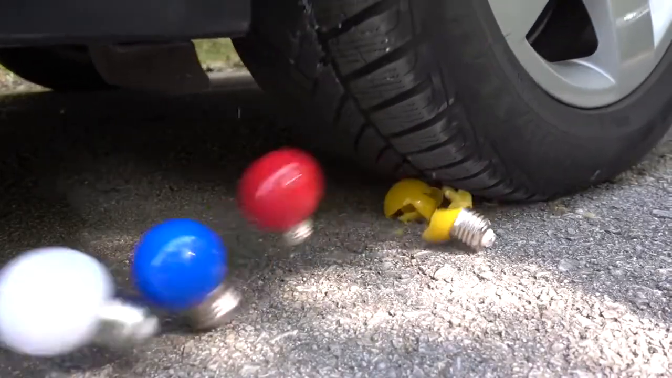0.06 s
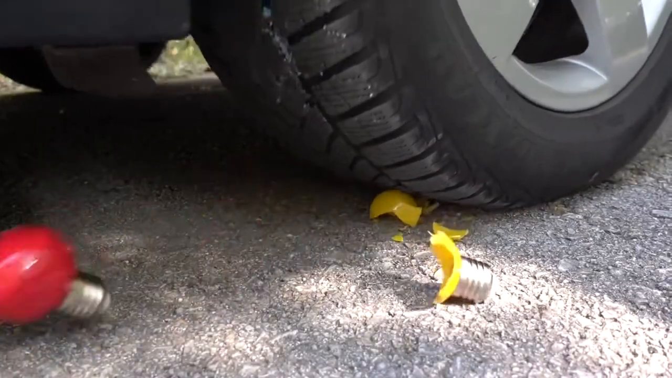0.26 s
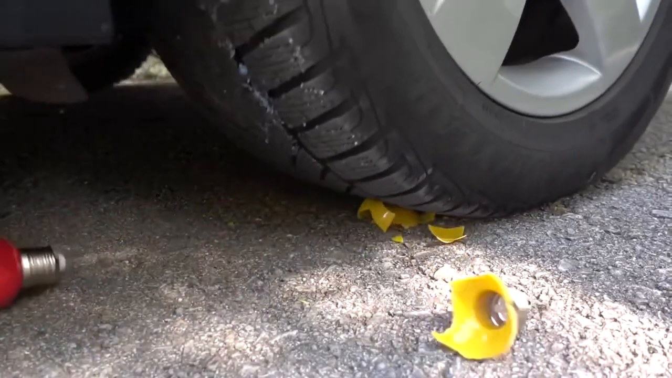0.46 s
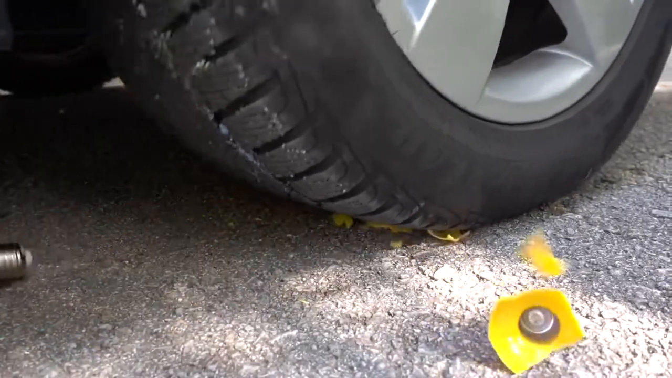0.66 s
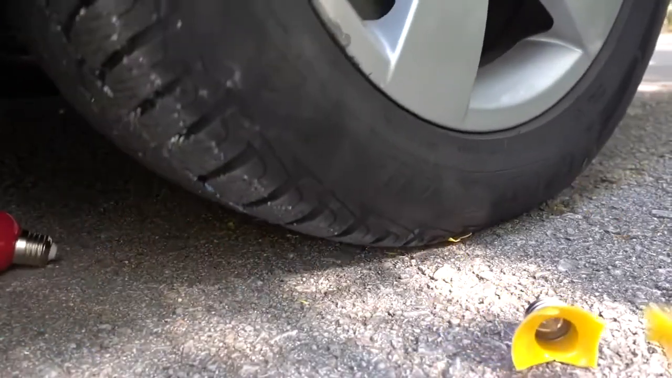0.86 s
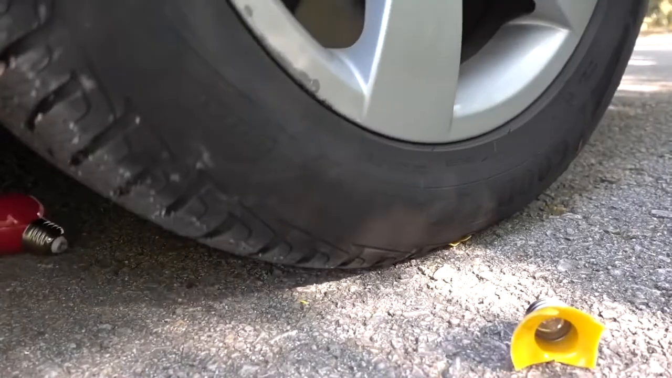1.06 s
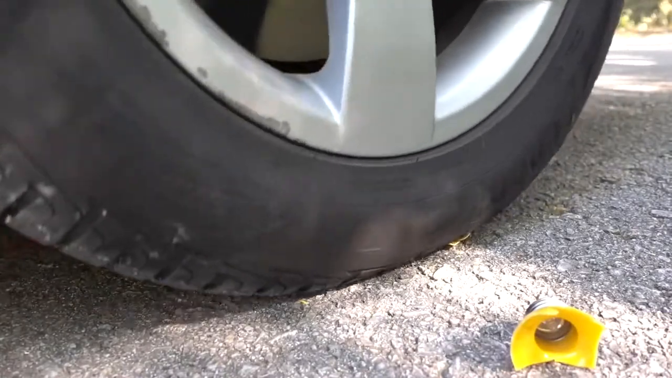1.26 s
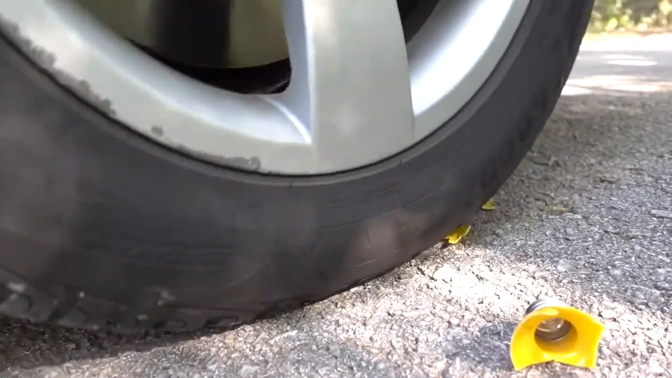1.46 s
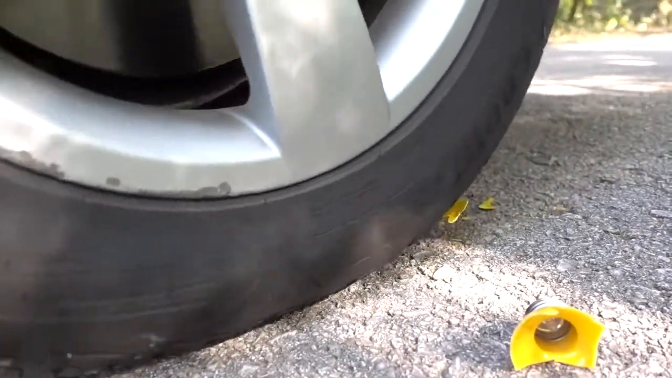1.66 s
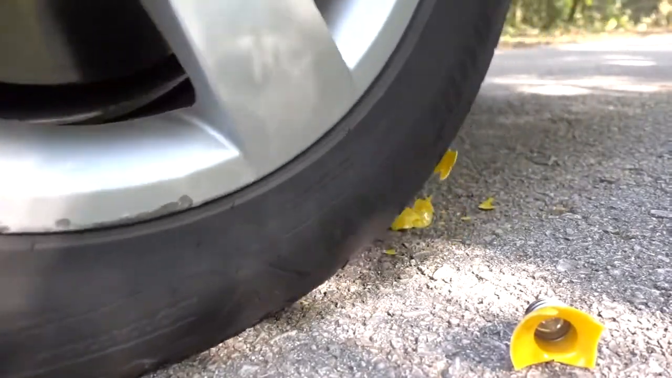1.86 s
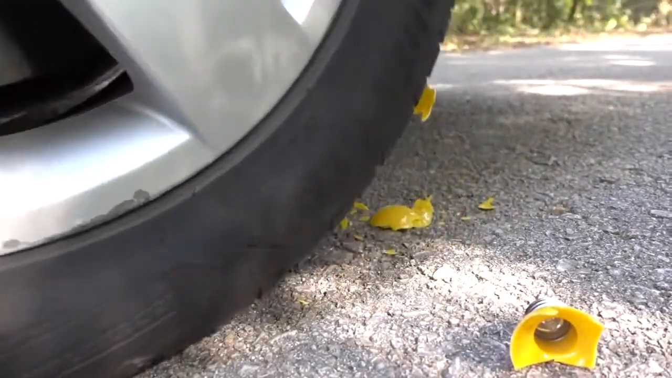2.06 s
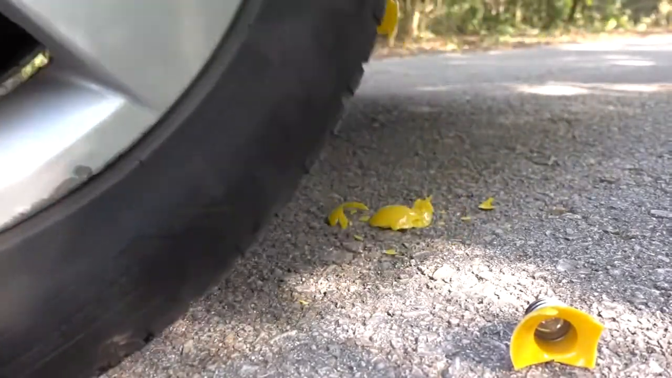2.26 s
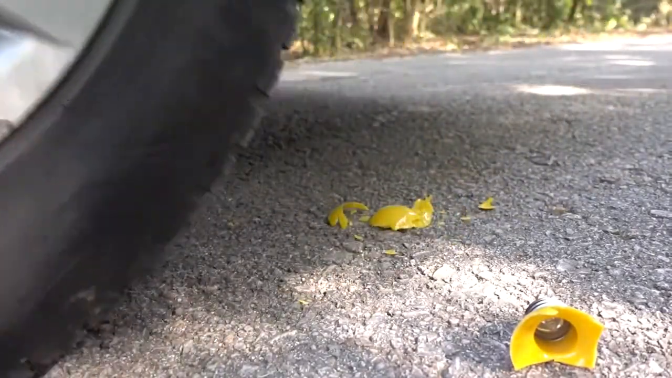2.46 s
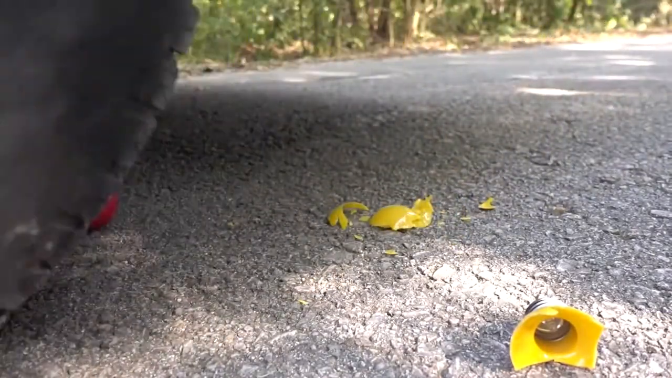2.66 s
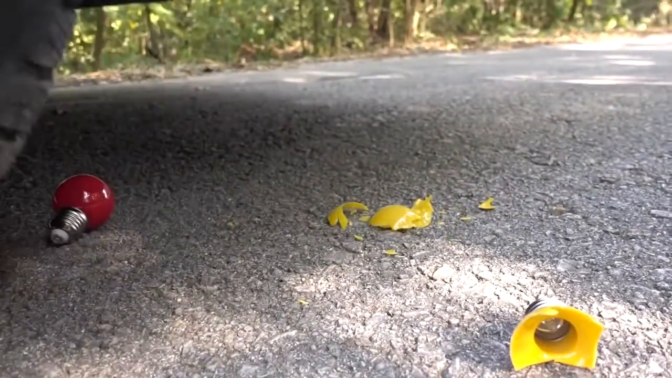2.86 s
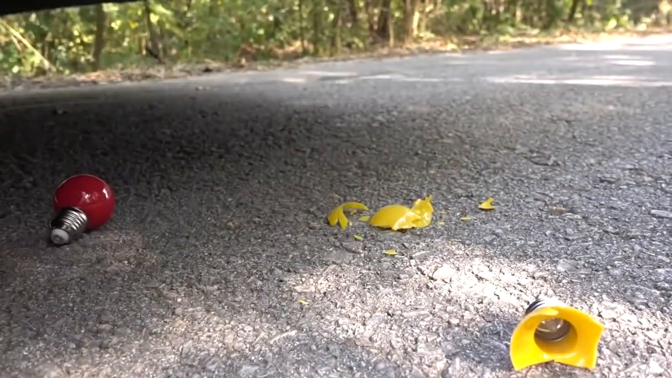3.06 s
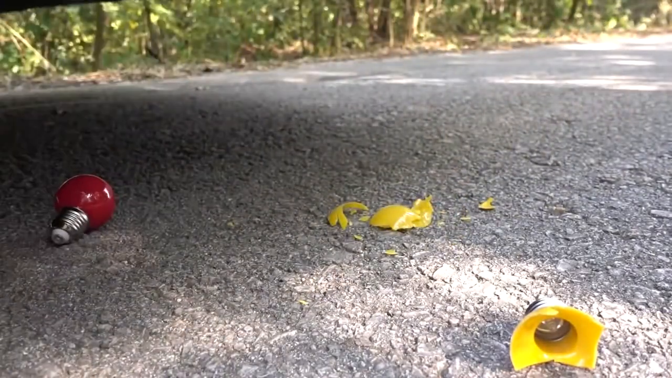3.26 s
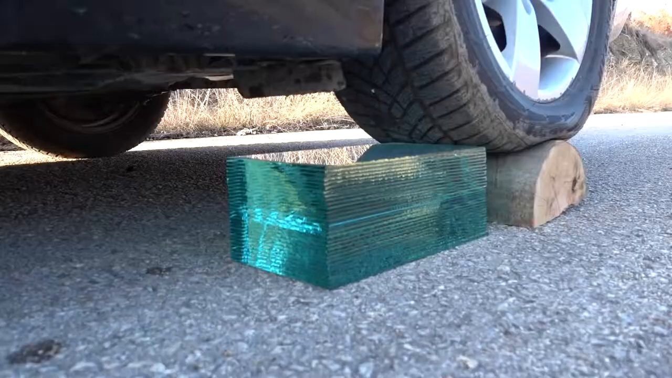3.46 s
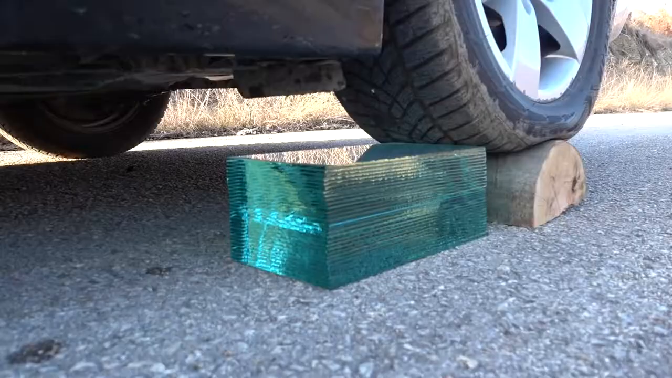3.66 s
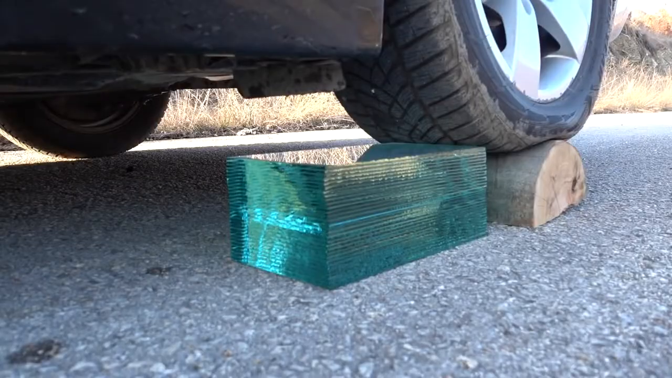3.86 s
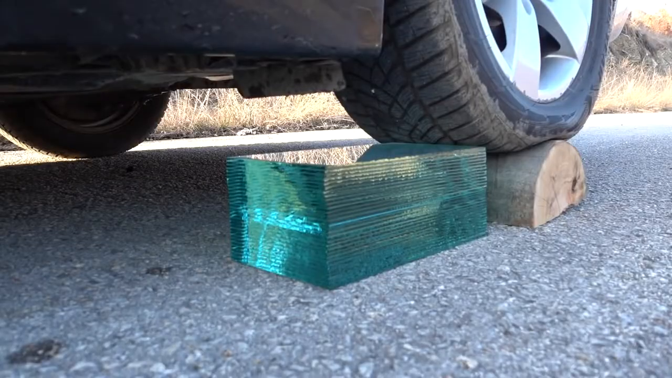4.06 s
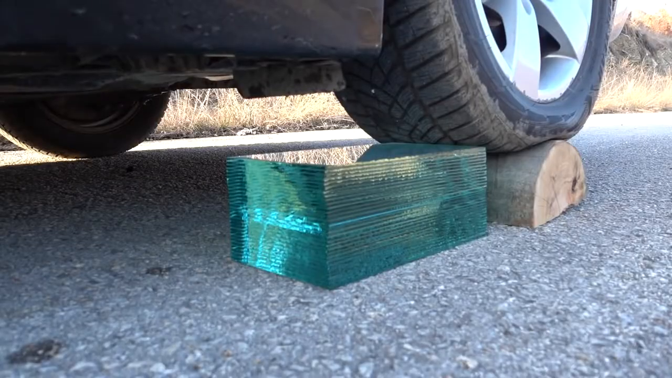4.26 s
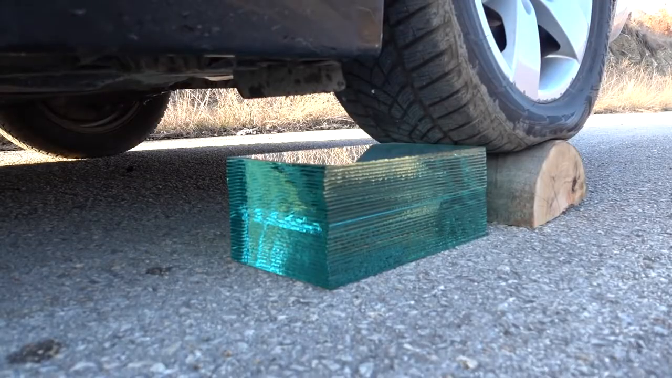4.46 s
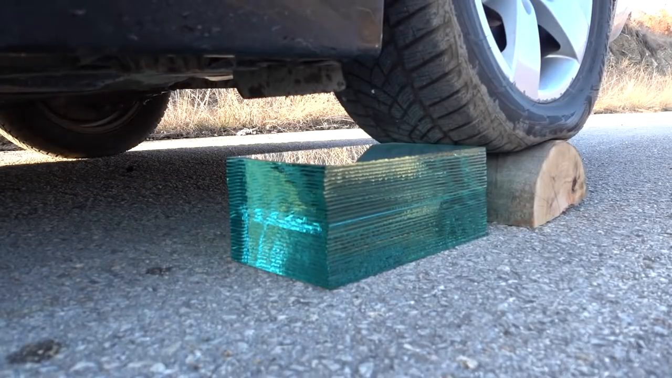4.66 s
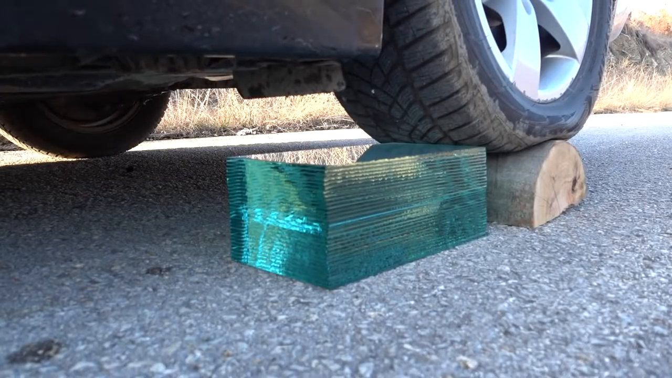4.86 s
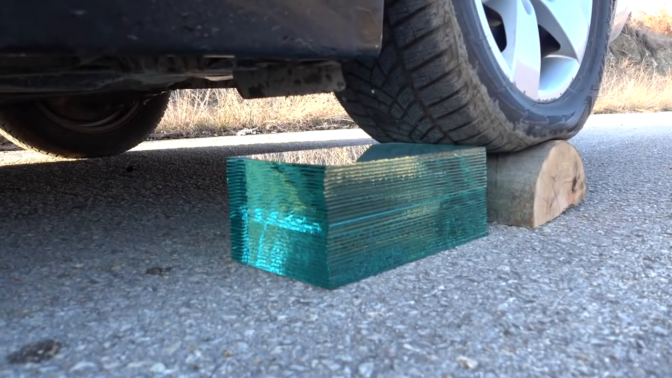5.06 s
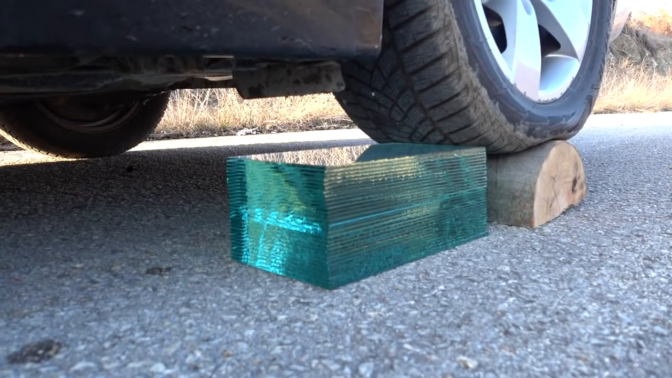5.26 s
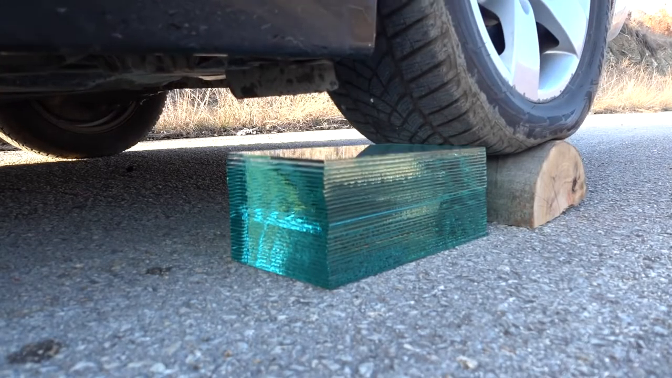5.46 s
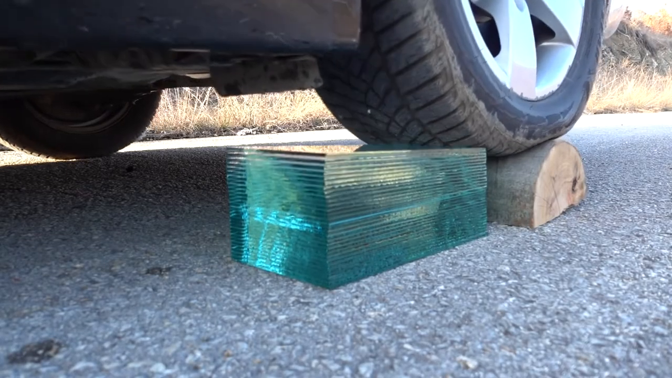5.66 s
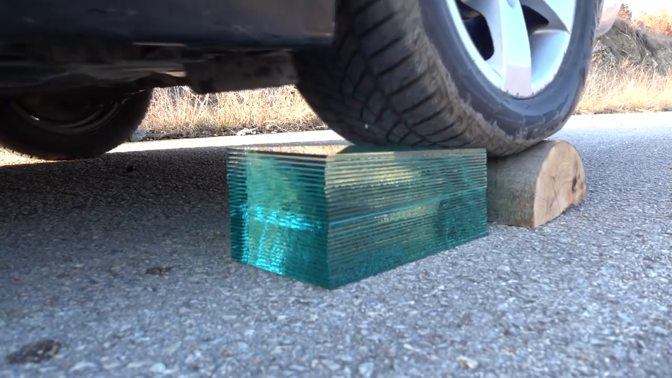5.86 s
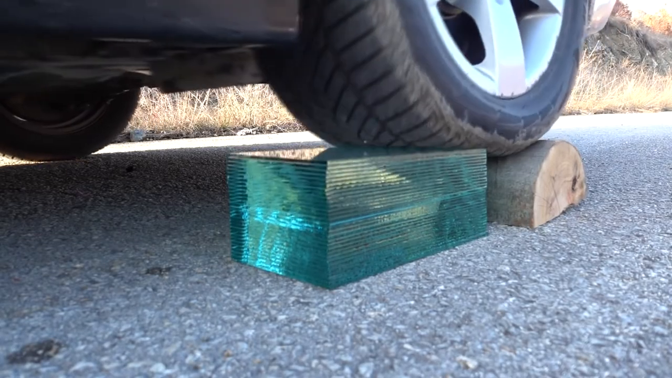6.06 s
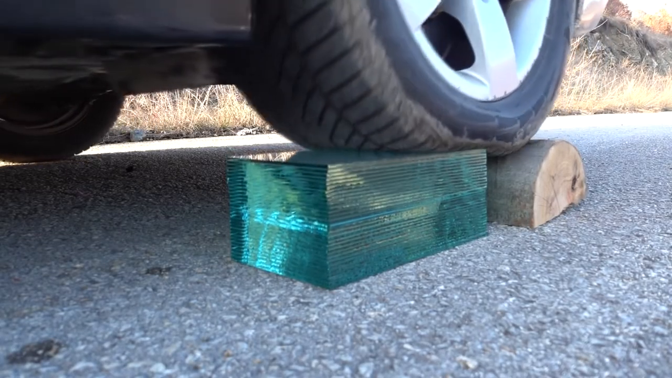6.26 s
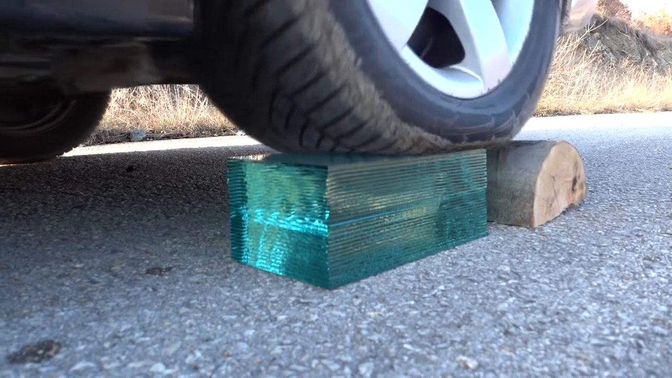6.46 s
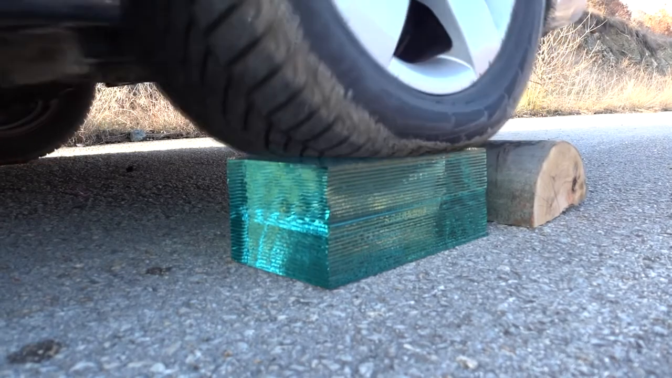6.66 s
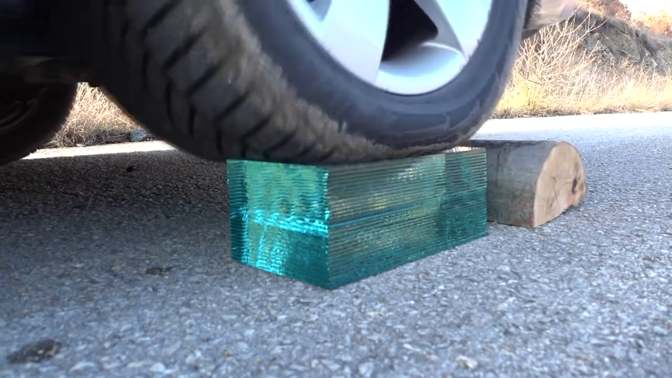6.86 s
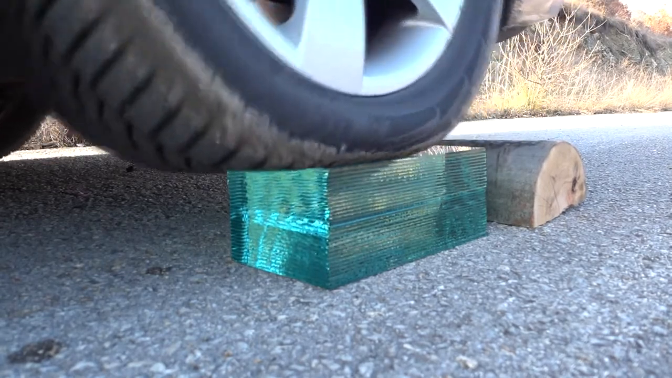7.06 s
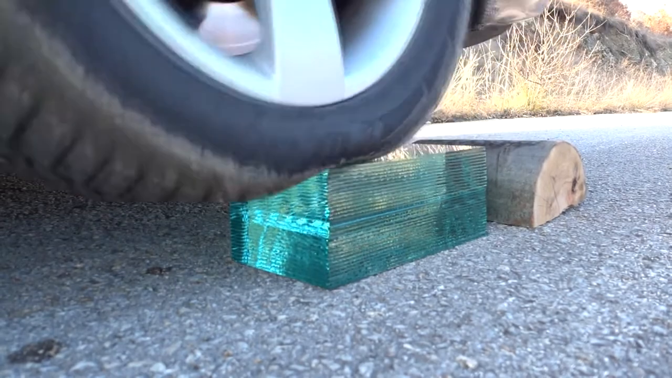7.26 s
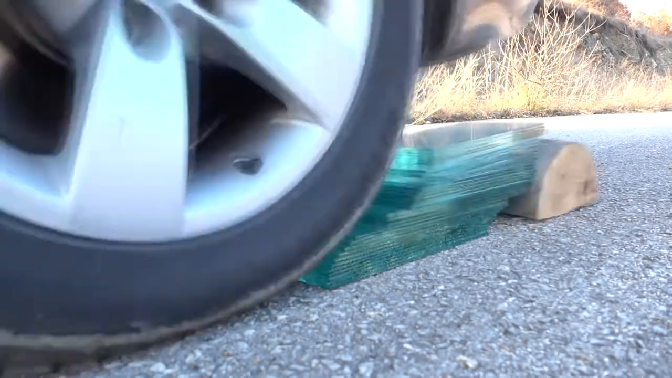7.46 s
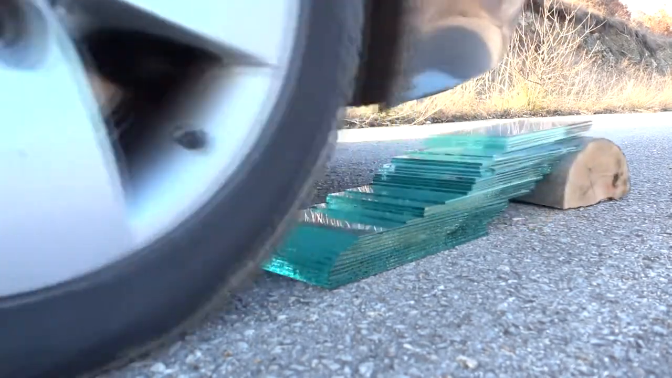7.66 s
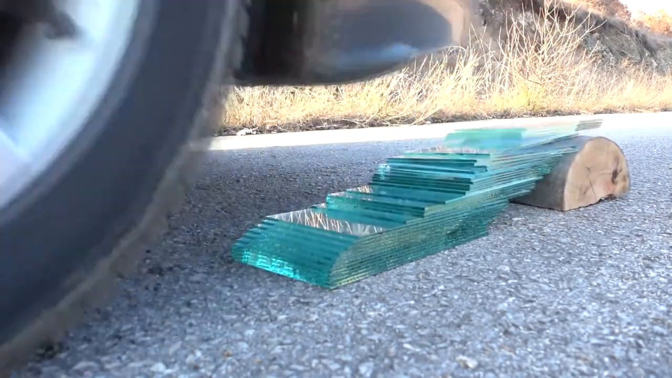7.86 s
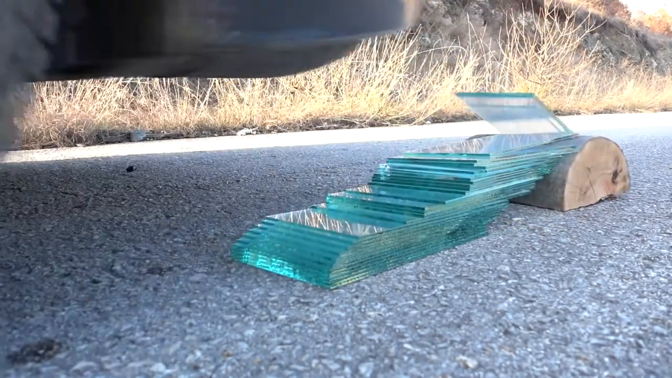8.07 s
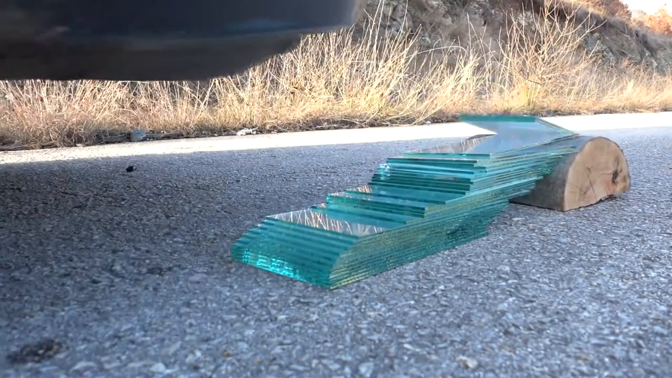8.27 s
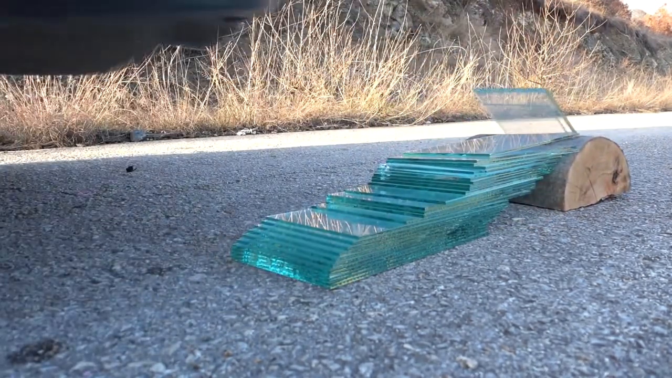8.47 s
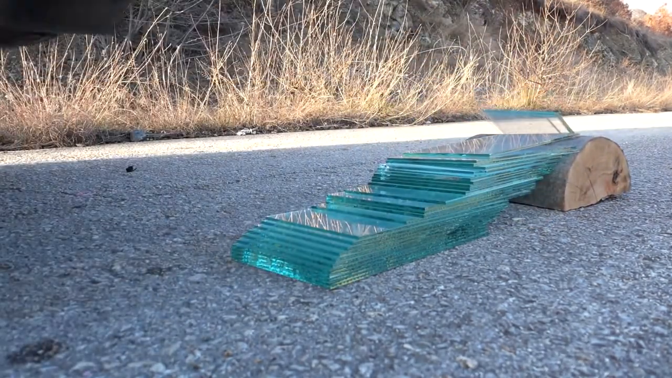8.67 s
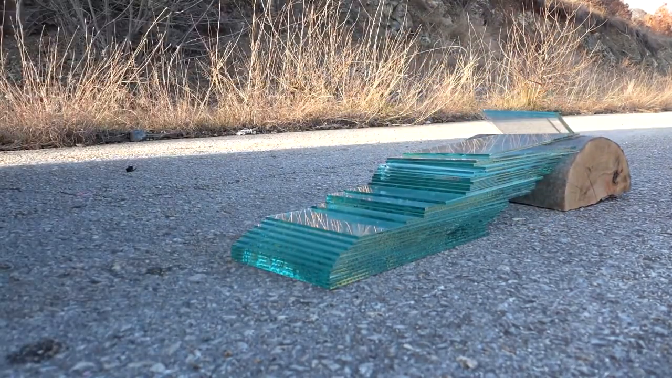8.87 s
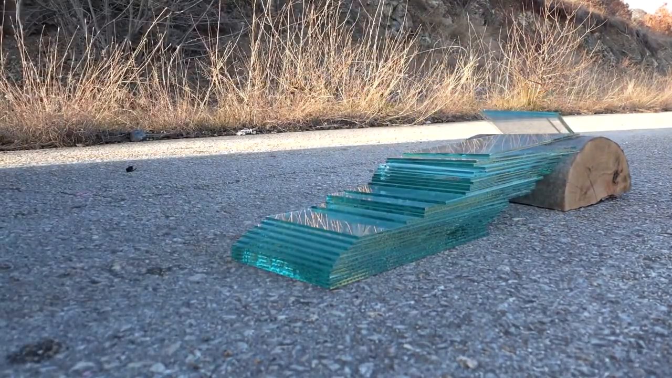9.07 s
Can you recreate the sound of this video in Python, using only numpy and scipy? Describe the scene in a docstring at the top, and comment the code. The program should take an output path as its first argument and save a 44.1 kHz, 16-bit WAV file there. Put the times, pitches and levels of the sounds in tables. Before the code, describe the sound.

Very close to a car tyre on asphalt outdoors, bulbs burst in loud overlapping snaps with crumbling splinters. Grit ticks sparsely as the wheel rolls off to the left. After a tiny dip the car clunks metallically, then glass panes crack in quick succession and grind. The wheel drops with dull thuds, the stack slides and clatters, and last panes clack as the car moves on.

```python
"""Beside a car tyre on asphalt: small light bulbs burst as sharp snaps with crumbling showers and a crunch of grains,
then grit ticks under the tread as the wheel rolls off to the left. The level dips briefly; the car clunks in
ringing metal modes and creeps onto a stack of glass panes, which crack one after another and grind.
The wheel drops off the edge with dull blows of damped noise, and the stack slides apart in a clattering rush of
grains; the exhaust passes the microphone and the last panes clack down as the car, in shaped noise, moves on."""
import sys
import numpy as np
from scipy import signal
from scipy.fft import rfft, irfft, next_fast_len
from scipy.io import wavfile
from scipy.ndimage import uniform_filter1d

SR = 44100
rng = np.random.default_rng(int(sys.argv[2]) if len(sys.argv) > 2 else 0)


def bounce(signal):
    """Save signal as a 16-bit WAV file at the path given by the first command-line argument."""
    frames = np.transpose(np.atleast_2d(signal))
    limited = np.clip(frames, -1, 1)
    pcm = np.round(limited * 32767).astype(np.int16)
    wavfile.write(sys.argv[1], SR, pcm)


N = 402191
TIME = np.arange(N) / SR

# All levels are relative: layer gains, the underbody scatter and the microphone input come after them.

# Engine and road hiss. Each row: time in seconds, level in dB.
ENGINE_LEVEL = [(1.8,-75),(3.2,-61),(4.1,-62.5),(5.0,-63.5),(5.6,-59),(7.2,-48),(7.9,-50),(9.12,-55)]
# Tyres rolling away. Each row: time in seconds, level in dB.
ROLL_LEVEL = [(2.9,-79),(3.5,-64),(3.7,-86),(7.3,-62),(7.6,-36),(8.2,-46),(8.8,-44),(9.12,-48)]
# The car lurches on its springs. Each row: time in seconds, body shaking in dB, ring of the tyre's air in dB,
# dying away of the body in dB per second.
SPRING_LURCHES = [(.03, -25.5, -24, 80), (.61, -33, -35, 69), (0.819, -41, -37.5, 77),
                  (3.69, -52.5, -67.5, 51), (5.358, -28.5, -35.5, 188), (7.5, -21.5, -22, 95)]
# The car clunks as it takes up the load. Each row: start in seconds, peak in dB.
LOAD_CLUNKS = [(3.492, -33.5), (3.617, -39), (3.734, -26.5), (3.742, -32), (4.164, -30), (4.526, -27.5),
               (4.535, -36.5), (5.187, -26), (5.217, -29.5), (5.227, -30.5), (5.243, -29.5)]
# What the clunks ring with. Each row: pitch in Hz, middle level in dB, 60 dB decay in seconds.
METAL_MODES = [(297,-14.5,0.16),(357,-4,0.17),(432,-1,0.13),(497,0,0.16),(582,-7,0.2),(624,-10,0.35),(825,-4,0.042),(1038,-25,0.36),(1709,-14,0.13),(1820,-8,0.1),(2043,-6,0.078),(2347,-8,.1),(2634,-12,0.059)]
# Dull blows through tyre and stack. Each row: start in seconds, peak in dB, pitch in Hz, 60 dB decay in seconds.
DULL_BLOWS = [(0.009, -19, 220, 0.077), (0.086, -19, 219, 0.059), (0.136, -47, 124, 0.079),
              (0.336, -25, 86, 0.018), (0.585, -22, 252, 0.17), (0.653, -28.5, 232, 0.17),
              (0.8, -19, 730, 0.21), (0.833, -28.5, 221, 0.17), (1.195, -37, 890, 0.21),
              (1.93, -42.5, 520, 0.052), (2.07, -44, 480, 0.14), (2.564, -40.5, 328, 0.048),
              (2.959, -49.5, 436, 0.24), (3.955, -54, 272, 0.12), (4.457, -44.5, 130, 0.15),
              (5.3, -37, 500, 0.27), (5.332, -26.5, 354, 0.14), (5.358, -24, 273, 0.11),
              (5.408, -37, 294, 0.054), (5.879, -38.5, 198, 0.036), (7.125, -25.5, 590, 0.086),
              (7.194, -24, 600, 0.061), (7.382, -25, 410, 0.13), (7.461, -12, 267, 0.17),
              (7.493, -14.5, 226, 0.12), (7.55, -25, 272, 0.12), (7.744, -18, 684, 0.061),
              (7.819, -25.5, 516, 0.14), (7.914, -17, 590, 0.057), (7.889, -28, 1500, 0.051),
              (8.171, -25.5, 590, 0.23), (8.604, -29.5, 200, 0.087)]
# The loudest bulb shells snapping. Each row: start in seconds, peak in dB, ring in Hz, crumbling in dB re the snap.
SHELL_SNAPS = [(0.134, -8.5, 2030, -9), (0.171, -3, 1340, -19.5), (0.211, -8, 2600, -13),
               (0.242, -1, 8300, -17), (0.335, -10.5, 3100, -16), (0.376, -2.5, 1770, -22),
               (0.405, -4, 7750, -11), (0.446, -12.5, 5670, -5.5), (0.506, -8, 5200, -9.5),
               (0.531, -5.5, 3040, -12), (0.587, 2, 1080, -12.5), (0.653, -4.5, 9100, -13),
               (0.686, -5.5, 4850, -15), (0.736, 4, 2040, -73), (0.784, -2, 7960, -25),
               (0.799, -5, 1310, -9), (0.854, -9, 4660, -20), (0.923, -2.5, 5200, -39),
               (0.955, -15.5, 1070, -11.5), (1.196, -7, 1490, -18), (1.456, -8.5, 3440, -18)]
# Larger stones and crumbs of glass under the tread. Each row: start in seconds, peak in dB, ring in Hz.
STONE_TICKS = [(1.065, -25, 1660), (1.12, -24, 2440), (1.273, -24.5, 915), (1.44, -21, 1390),
               (1.603, -24.5, 1500), (1.672, -25, 5400), (1.742, -28.5, 1700), (1.863, -27.5, 1790),
               (1.912, -26.5, 745), (1.976, -29.5, 1130), (2.088, -30.5, 585), (2.138, -25.5, 2160),
               (2.244, -34.5, 616), (2.293, -24.5, 5050), (2.337, -32, 624), (2.382, -27.5, 2240),
               (2.459, -25.5, 930), (2.479, -23, 910), (2.563, -28, 1350), (2.802, -27, 993),
               (2.833, -25, 1200), (3.029, -36, 4500)]
# The tread pressing on loose grit. Each row: time in seconds, level in dB.
TREAD_LEVEL = [(0, -29.5), (1.05, -42.5), (1.35, -48), (1.6, -47), (1.85, -56), (2.2, -53), (2.5, -47.5),
               (2.85, -46.5), (3.1, -57), (3.45, -69)]
# A thin whistling hiss while the wheel turns. Each row: time in seconds, level in dB.
WHISTLE_LEVEL = [(.9,-46),(1.8,-75),(2.6,-54.5),(3.0,-67)]
# The wheel rolls off to the left. Each row: time in seconds, left minus right in dB.
TREAD_PLACE = [(.5,0.5),(1.7,2),(2.8,4),(3.4,11.5)]
# The loudest cracks of the panes. Each row: start in seconds, peak in dB, crumbling in dB re the crack.
LOUD_CRACKS = [(5.6052, -18, -6), (5.633, -10, -5), (5.661, -14, -8), (5.6903, -6.5, -9), (5.7403, -14, -1),
               (5.8557, -9.5, -7), (5.923, -13, -7), (5.934, -16, 3), (5.98, -4.5, -8),
               (5.998, -11.5, -8.5), (6.0388, -11.5, -13), (6.0655, -1, -21), (6.113, -6, -15.5),
               (6.127, -6, -13), (6.1494, 1, -27), (6.2258, -3.5, -17), (6.2345, -12, -5.5),
               (6.2813, -10, -11), (6.3064, -5, -32), (6.3355, -4, -14), (6.3604, -7, -16),
               (6.4084, -22, -13), (6.4593, -9, -14.5), (6.4857, -22, -14), (6.5181, -5.5, -19),
               (6.5307, -17.5, -23), (6.59, -26, -17), (6.629, -20, -37), (6.6522, -9.5, -16),
               (6.6836, -38, -28), (6.736, -18, -16), (6.7508, -16, -25), (6.774, -14.5, -36),
               (6.7912, -5, -24), (6.8269, -4.5, -22), (6.8516, -6, -22), (6.8794, -8, -22),
               (6.9056, -14, -16.5), (6.963, -7, -13), (6.9795, -11, -3), (7.016, -11.5, -27),
               (7.0707, -11, -13), (7.1255, -12.5, -3.5), (7.137, -13, -3.5), (7.193, -0.5, -23),
               (7.228, -10, -5), (7.2618, -1.5, -23), (7.362, -20.5, -4.5)]
# The cracks' ring sinks as the tyre's weight damps the stack, then comes part way back.
# Each row: time in seconds, middle pitch in Hz.
CRACK_PITCH = [(5.6, 3980), (6.0, 3950), (6.3, 2770), (6.8, 2960), (7.3, 3340)]
# Loose panes clacking on each other. Each row: start in seconds, peak in dB, ring in Hz, chatter in dB re the clack.
LOOSE_CLACKS = [(7.5068, -17, 2230, -3.5), (7.5618, -17, 2920, -4), (7.6097, -10.5, 2020, -3),
                (7.6703, -14, 2030, -25), (7.7196, -15.5, 2000, -3.5), (7.9948, -15.5, 5350, -33),
                (8.0325, -15.5, 4400, -17), (8.0848, -18, 6300, -18.5), (8.299, -18, 2320, -2),
                (8.3096, -11.5, 2260, -12), (8.319, -23.5, 2730, -8), (8.5311, -11, 1940, -16.5),
                (8.5602, -15, 2000, -11), (8.6618, -14.5, 2250, -14), (8.385, -30.5, 2180, -4.5),
                (8.7184, -16, 4100, -9)]
# The panes shift on each other. Each row: start in seconds, end in seconds, scrape in dB, clatter in dB.
STACK_SLIDES = [(5.496, 7.4, -49.5, -80), (7.529, 7.72, -18, -16), (7.952, 7.996, -32, -25),
                (8.55, 8.772, -45, -40)]

# Spectral shapes, scaled to unit energy in use. Each row: frequency in Hz, density in dB per Hz.
RUMBLE_SPECTRUM = [(20,-10.5),(60,1.5),(140,6),(420,-9.5),(2000,-51)]
ENGINE_SPECTRUM = [(50,-15.5),(140,-6),(450,-9.5),(640,-8.5),(850,-20),(1550,-21.5),(2200,-15.5),(2700,-23.5),(5500,-28.5),(11000,-32)]
ROLL_SPECTRUM = [(270,-0.5),(1300,-4),(3300,-16),(6000,-34)]
BULB_SPECTRUM = [(200,-6.5),(420,-10),(1100,-4.5),(2640,-5),(11000,-4.5)]
TICK_SPECTRUM = [(150,-5.5),(400,6),(1500,5.5),(3500,-2),(11000,0)]
SPLINTER_SPECTRUM = [(900,-24),(1600,-4.5),(2600,0),(3800,-2),(5200,-1),(6800,-4.5),(11000,-2.5)]
GRIT_SPECTRUM = [(200,-11.5),(400,-4),(650,-0.5),(1100,-1.5),(1800,-5.5),(2800,-13.5),(5000,-30)]
PANE_SPECTRUM = [(180,-8.5),(400,-3.5),(1000,-2.5),(2600,1),(4200,-2.5),(7700,-1.5),(11000,-5.5),(13000,-10.5)]
CLACK_SPECTRUM = [(250,4.5),(900,3),(2000,-0.5),(4500,-3.5),(11000,-14),(13000,-40)]
SCRAPE_SPECTRUM = [(900,-19.5),(1700,-9),(2600,-4),(4200,-6),(6000,-10.5),(11000,-13.5),(13000,-63)]
# Likeness of left and right. Each row: frequency in Hz, correlation from 0 to 1.
STEREO_LIKENESS = [(150,.97),(400,.85),(1000,.78),(2500,.65),(5000,.3)]

# car
TYRE_HZ, EXHAUST_HZ = 226, 132.6
TYRE_ROLL_DB, TYRE_FLOOR_DB = -11.5, -76.5  # re the rolling roar; at rest
TYRE_FALL_SHARE = 0.66  # the air in the tyre rings on longer than the body
LURCH_RISE_DB_PER_S = 227
RUMBLE_ROLL_DB, RUMBLE_FLOOR_DB = -11, -71  # re the rolling roar; at rest
# the exhaust passes the microphone
EXHAUST_START_S, EXHAUST_END_S, EXHAUST_DB = 7.65, 8.02, -41.5
EXHAUST_RISE_DB_PER_S, EXHAUST_FALL_DB_PER_S = 47, 36
# the body shudders while the car strains to climb the stack: an end before the start means no hold,
# so the fall is already under way when the level has risen
STRAIN_START_S, STRAIN_FALL_FROM_S, STRAIN_DB = 4.2, 1.23, -59
STRAIN_RISE_DB_PER_S, STRAIN_FALL_DB_PER_S = 298, 1.5

# bulbs: they give way under full load, then the crunch dies away
CRUSH_END_S, CRUSH_FALL_DB_PER_S = 0.7, 73
CRUSH_SPLINTER_DB, CRUSH_GRIT_DB = -26, -37.5
# splinters stuck in the tread, re the grit, fade as it rolls
TREAD_SPLINTER_DB, SPLINTER_FADE_DB_PER_S = 4, 5
TICK_CRUMBLE_DB = -11

# panes
RING_SCATTER_OCT = 0.2
LEAD_S, LEAD_LOSS_DB = 0.0019, 23  # a faint tick just ahead of each crack
RUN_ON_MIN_S, RUN_ON_MAX_S, RUN_ON_LOSS_DB = 0.013, 0.051, 15  # a weaker crack follows each one
RUN_ON_CRUMBLE_DB = -22  # for ticks ahead and run-ons
# the broken edges then grind on each other
GRIND_DB, GRIND_CLATTER_DB, GRIND_FALL_DB_PER_S = -26.5, -29.5, 226
SLIDE_RISE_DB_PER_S, SLIDE_FALL_DB_PER_S = 158, 289
CLATTER_FALL_DB_PER_S, CLATTER_LEAD_S = 120, 0.042

# whole scene and microphone chain
PING_WIDTH_HZ = 150
GAP_START_S, GAP_END_S = 3.523, 3.553
INPUT_DB, CEILING = 2, 0.62  # ceiling as a share of full scale
TREBLE_HZ, CUTOFF_HZ, TOP_LEAK_DB = 11150, 15300, -29


def from_db(db):
    """Decibels to gain."""
    return 10 ** (np.asarray(db) / 20)


def rms_one(x):
    """Scale to unit rms."""
    return x / np.sqrt(np.mean(x ** 2) + 1e-20)


def level_curve(rows):
    """Gain in time from rows of seconds and dB, silent outside their span but for 0.1 s ramps."""
    s, db = np.transpose(rows)
    ramps = np.interp(TIME, [s[0] - .1, s[0], s[-1], s[-1] + .1], [0, 1, 1, 0])
    return from_db(np.interp(TIME, s, db)) * ramps


def swell(start_s, end_s, level_db, rise, fall):
    """Gain that rises to a level, holds from start to end and dies away; slopes in dB per second."""
    t = TIME[::40]
    before = np.maximum(start_s - t, 0)
    after = np.maximum(t - end_s, 0)
    return np.interp(TIME, t, from_db(level_db - abs(rise) * before - abs(fall) * after))


def at_hz(points, hz):
    """Read a spectrum on a log-frequency axis."""
    f, value = np.transpose(points)
    return np.interp(np.log(hz + 1), np.log(f), value)


def response(spectrum, size=4096):
    """Causal (minimum-phase) impulse response of a spectrum, of unit energy."""
    magnitude = from_db(at_hz(spectrum, np.fft.rfftfreq(size, 1 / SR)))
    cepstrum = irfft(np.log(magnitude))
    folded = 2 * cepstrum * (np.arange(size) < size // 2)
    h = irfft(np.exp(rfft(folded)))[:size // 2]
    return h / np.linalg.norm(h)


def through(x, h):
    """Convolve both channels, keeping the length."""
    return signal.oaconvolve(x, np.atleast_2d(h), axes=-1)[:, :x.shape[-1]]


def resonate(x, hz, width_hz):
    """Two-pole resonance with gain 1 on top."""
    r = np.exp(-np.pi * width_hz / SR)
    top = np.array([1, 0, -1]) * (1 - r * r) / 2
    poles = [1, -2 * r * np.cos(2 * np.pi * hz / SR), r * r]
    return signal.lfilter(top, poles, x + 1e-18)


def spread(pair):
    """Two unrelated signals become left and right: alike in the bass, apart in the treble."""
    size = next_fast_len(pair.shape[-1])
    mid, side = rfft(pair, size)
    alike = np.clip(at_hz(STEREO_LIKENESS, np.fft.rfftfreq(size, 1 / SR)), 0, 1)
    side = side * np.sqrt((1 - alike) / (1 + alike))
    return irfft(np.array([mid + side, mid - side]), size)[:, :pair.shape[-1]]


def noise(size):
    """Flat-spectrum noise, spread in stereo."""
    return spread(rng.standard_normal((2, size)))


def add(out, s, sound):
    """Mix a sound in at a time in seconds."""
    i = max(0, round(s * SR))
    out[:, i:i + sound.shape[-1]] += sound[:, :N - i]


def car():
    """Noise shaped into road rumble, the ring of the tyre's air, exhaust drone, rolling roar and engine hiss."""
    rolling = level_curve(ROLL_LEVEL)
    shaking_power = sum(swell(s, s, db, LURCH_RISE_DB_PER_S, fall) ** 2 for s, db, _, fall in SPRING_LURCHES)
    ringing_power = sum(swell(s, s, db, LURCH_RISE_DB_PER_S, fall * TYRE_FALL_SHARE) ** 2
                        for s, _, db, fall in SPRING_LURCHES)
    strain = swell(STRAIN_START_S, STRAIN_FALL_FROM_S, STRAIN_DB, STRAIN_RISE_DB_PER_S, STRAIN_FALL_DB_PER_S)
    rolling_rumble = from_db(RUMBLE_ROLL_DB) * rolling + from_db(RUMBLE_FLOOR_DB)
    rumble_gain = np.sqrt(shaking_power + strain ** 2 + rolling_rumble ** 2)
    rolling_ring = from_db(TYRE_ROLL_DB) * rolling + from_db(TYRE_FLOOR_DB)
    tyre_gain = np.sqrt(ringing_power + rolling_ring ** 2)
    exhaust_gain = swell(EXHAUST_START_S, EXHAUST_END_S, EXHAUST_DB,
                         EXHAUST_RISE_DB_PER_S, EXHAUST_FALL_DB_PER_S)

    air = resonate(resonate(noise(N), TYRE_HZ, 18), TYRE_HZ, 36)
    # constant rolling keeps the ring fairly even
    air_power = uniform_filter1d(air ** 2 + 1e-12, size=800)
    air = rms_one(air / air_power ** 0.14)
    drone = rms_one(resonate(resonate(noise(N), EXHAUST_HZ, 14), EXHAUST_HZ, 40))
    road = through(noise(N), response(RUMBLE_SPECTRUM))
    roar = rolling * through(noise(N), response(ROLL_SPECTRUM))
    engine = level_curve(ENGINE_LEVEL) * through(noise(N), response(ENGINE_SPECTRUM))
    return rumble_gain * road + tyre_gain * air + exhaust_gain * drone + roar + engine


def clunks(contact_s, vary_db, rattle_db, rattle_t60, size=14000):
    """A rough metal contact rings the underbody in decaying modes, with a short rattle."""
    out, t = np.zeros((2, N)), np.arange(size) / SR
    for s, peak_db in LOAD_CLUNKS:
        modes = 0
        for hz, db, t60 in METAL_MODES:
            gain = from_db(db + vary_db * rng.standard_normal() - 60 * t / t60)
            modes = modes + gain * np.sin(2 * np.pi * (hz * t + rng.random()))
        rattle = rms_one(resonate(noise(size), 1500, 1340)) * from_db(rattle_db - 60 * t / rattle_t60)
        hit = (modes + rattle) * (1 - np.exp(-t / contact_s))
        add(out, s, from_db(peak_db) * hit / np.abs(hit).max())
    return out


def thumps(rise_s, damping, dull_ratio, size=16000):
    """The rubber slaps down and shakes what lies under it: a dull, heavily damped shudder."""
    out, t = np.zeros((2, N)), np.arange(size) / SR
    for s, peak_db, hz, t60 in DULL_BLOWS:
        soft = signal.butter(2, hz * dull_ratio, fs=SR, output="sos")
        shudder = signal.sosfilt(soft, resonate(noise(size), hz, hz * damping))
        blow = shudder * (1 - np.exp(-t / rise_s)) * from_db(-60 * t / t60)
        add(out, s, from_db(peak_db) * blow / np.abs(blow).max())
    return out


def cracks(rows, colour, snap_s, crackle_db, crumble_t60, ring_db, ring_q, ping_db, lumps_db, width, size=7000):
    """Each break: a sharp release with a brief crackle, then a dying shower of micro-cracks, both ringing the piece."""
    out, t, body = np.zeros((2, N)), np.arange(size) / SR, response(colour)
    for s, peak_db, hz, crumble_db in rows:
        burst = rng.standard_normal((2, size)) * np.exp(-t / snap_s)
        burst /= np.linalg.norm(burst, axis=1, keepdims=True)
        click = t == 0
        snap = click + from_db(crackle_db) * burst[0] + width * burst[1] * [[1], [-1]]
        # the shower comes in lumps: a random level every 60 samples
        coarse = t[::60]
        lumps = from_db(lumps_db * np.interp(t, coarse, rng.standard_normal(len(coarse))))
        lumps = rms_one(lumps)
        # a broad, damped main mode and thin pings, two of them at random for the shard's shape
        pings = [hz, *rng.uniform(hz, TREBLE_HZ, 2)]
        both = np.array([snap, noise(size)])
        main_ring = from_db(ring_db) * resonate(both, hz, hz / ring_q)
        thin_rings = from_db(ping_db) * sum(resonate(both, f, PING_WIDTH_HZ) for f in pings)
        both = both + main_ring + thin_rings
        snap, shower = through(both[0], body), through(both[1], body)
        snap = snap / np.abs(snap.mean(0)).max()
        shower = rms_one(shower) * lumps * from_db(crumble_db - 60 * t / crumble_t60)
        add(out, s + .0008, from_db(peak_db) * (snap + shower))
    return out


def grains(colour, per_s, size_db, ping_db, cycles, hiss_db, low_hz, high_hz, count=14):
    """Countless tiny contacts, each a tick plus the ring of one of many fragments, over a fine hiss; rms 1."""
    out, total = np.zeros((2, N)), int(per_s * N / SR / count) + 1
    for hz in np.geomspace(low_hz, high_hz, count):
        draws = np.random.default_rng(rng.integers(2 ** 31)).random((total, 4))
        when, strength, sign, place = draws.T
        # many small contacts, few big ones
        height = from_db(size_db * np.minimum(-np.log(1 - strength), 4)) * np.sign(sign - .5)
        clicks = np.zeros((2, N))
        clicks[:, (when * N).astype(int)] = height, height * np.sqrt(3) * (2 * place - 1)
        out += clicks + from_db(ping_db) * resonate(clicks, hz, hz / cycles)
    hiss = from_db(hiss_db) * rng.standard_normal((2, N))
    return rms_one(through(spread(rms_one(out) + hiss), response(colour)))


def bulbs():
    """Thin shells burst, their splinters are ground into the asphalt, and grit ticks under the tread."""
    crush = swell(0, CRUSH_END_S, 0, 0, CRUSH_FALL_DB_PER_S)
    tread = level_curve(TREAD_LEVEL)
    stuck = from_db(TREAD_SPLINTER_DB - SPLINTER_FADE_DB_PER_S * TIME) * tread
    splinter_gain = np.hypot(from_db(CRUSH_SPLINTER_DB) * crush, stuck)
    grit_gain = np.hypot(from_db(CRUSH_GRIT_DB) * crush, tread)
    snaps = cracks(SHELL_SNAPS, BULB_SPECTRUM, snap_s=0.0004, crackle_db=7, crumble_t60=0.041,
                   ring_db=8.0, ring_q=2.8, ping_db=4, lumps_db=1.5, width=0.59)
    tick_rows = [(*tick, TICK_CRUMBLE_DB) for tick in STONE_TICKS]
    ticks = cracks(tick_rows, TICK_SPECTRUM, snap_s=0.00063, crackle_db=2.5, crumble_t60=0.041,
                   ring_db=2, ring_q=2.9, ping_db=5, lumps_db=-2.5, width=1.0)
    splinters = splinter_gain * grains(SPLINTER_SPECTRUM, per_s=700, size_db=4.0, ping_db=18.0, cycles=85,
                                       hiss_db=-10.5, low_hz=1988, high_hz=10380)
    gravel = grit_gain * grains(GRIT_SPECTRUM, per_s=350, size_db=4.5, ping_db=5, cycles=5,
                                hiss_db=-3, low_hz=400, high_hz=3000, count=8)
    whistle_bands = sum(resonate(noise(N), hz, hz / 14) for hz in (2830, 5080))
    whistle = level_curve(WHISTLE_LEVEL) * rms_one(whistle_bands)
    mix = snaps + ticks + from_db(-1.0) * splinters + from_db(-3.5) * gravel + whistle
    left = from_db(np.interp(TIME, *np.transpose(TREAD_PLACE)) / 2)
    return mix * np.array([left, 1 / left])


def pane_breaks():
    """Rows for each crack, its faint forerunner and its weaker run-on, with pitches scattered about the curve."""
    rows = []
    for s, peak_db, crumble_db in LOUD_CRACKS:
        scatter = 2 ** (RING_SCATTER_OCT * rng.standard_normal(3))
        lead_hz, main_hz, late_hz = np.interp(s, *np.transpose(CRACK_PITCH)) * scatter
        late_s = s + rng.uniform(RUN_ON_MIN_S, RUN_ON_MAX_S)
        rows += [(s - LEAD_S, peak_db - LEAD_LOSS_DB, lead_hz, RUN_ON_CRUMBLE_DB),
                 (s, peak_db, main_hz, crumble_db),
                 (late_s, peak_db - RUN_ON_LOSS_DB, late_hz, RUN_ON_CRUMBLE_DB)]
    return rows


def sliding():
    """Gains of scrape and clatter: fresh edges grind after every crack, and the stack shifts in a few slides."""
    kicks = np.zeros(N)
    for s, peak_db, _ in LOUD_CRACKS:
        kicks[round(s * SR)] = from_db(peak_db) ** 2
    # each crack adds power, which then drains away
    keep = from_db(-GRIND_FALL_DB_PER_S / SR) ** 2
    grind = np.sqrt(signal.lfilter([1], [1, -keep], kicks + 1e-18))
    scrape, clatter = from_db(GRIND_DB) * grind, from_db(GRIND_CLATTER_DB) * grind
    for start, end, scrape_db, clatter_db in STACK_SLIDES:
        scrape_swell = swell(start, end, scrape_db, SLIDE_RISE_DB_PER_S, SLIDE_FALL_DB_PER_S)
        clatter_swell = swell(start - CLATTER_LEAD_S, end - CLATTER_LEAD_S, clatter_db,
                              SLIDE_RISE_DB_PER_S, CLATTER_FALL_DB_PER_S)
        scrape = np.hypot(scrape, scrape_swell)
        clatter = np.hypot(clatter, clatter_swell)
    return scrape, clatter


def panes():
    """Sheets crack under the load, then scrape, clatter and clack as the stack fans out."""
    scrape, clatter = sliding()
    breaks = cracks(pane_breaks(), PANE_SPECTRUM, snap_s=0.00041, crackle_db=6.5, crumble_t60=0.042,
                    ring_db=12.5, ring_q=1.5, ping_db=14.5, lumps_db=-1.0, width=0.08)
    clacks = cracks(LOOSE_CLACKS, CLACK_SPECTRUM, snap_s=0.0024, crackle_db=5.0, crumble_t60=0.1,
                    ring_db=12, ring_q=0.5, ping_db=15.5, lumps_db=3.0, width=0.52)
    scraping = scrape * grains(SCRAPE_SPECTRUM, per_s=2500, size_db=6.5, ping_db=15.0, cycles=22,
                               hiss_db=-9, low_hz=1793, high_hz=8840)
    clattering = clatter * grains(GRIT_SPECTRUM, per_s=800, size_db=5.0, ping_db=20.0, cycles=11,
                                  hiss_db=-0.5, low_hz=468, high_hz=2660, count=10)
    return breaks + clacks + from_db(-2.5) * scraping + from_db(-7.0) * clattering


def underbody(x, wet_db, t60, size=16000):
    """Sound scatters briefly between the road and the underside of the car."""
    t = np.arange(size) / SR
    echoes = noise(size) * from_db(-60 * t / t60) * (t > .003)
    return x + from_db(wet_db) * through(x, echoes / np.linalg.norm(echoes[0]))


def scene():
    """Car, blows and glass together; the level dips briefly between the two crushings."""
    glass = bulbs() + panes()
    blows = from_db(5.5) * thumps(rise_s=0.002, damping=0.59, dull_ratio=2.5)
    metal = from_db(-2.0) * clunks(contact_s=0.0005, vary_db=4.0, rattle_db=-2.5, rattle_t60=0.071)
    near_road = underbody(glass + blows + metal, wet_db=-10, t60=0.087)
    in_gap = (TIME > GAP_START_S) & (TIME < GAP_END_S)
    sounding = uniform_filter1d(1.0 - in_gap, size=100)
    return (near_road + car()) * np.maximum(sounding, from_db(-34))


def record(dry):
    """The microphone chain rounds peaks; the top octave is mostly shut off and ends in a steep cut."""
    rounded = CEILING * np.tanh(from_db(INPUT_DB) * dry / CEILING)
    treble_stop = signal.ellip(8, .3, 60, TREBLE_HZ, fs=SR, output="sos")
    steep_cut = signal.ellip(8, .3, 80, CUTOFF_HZ, fs=SR, output="sos")
    dull = signal.sosfilt(treble_stop, rounded)
    return signal.sosfilt(steep_cut, dull + from_db(TOP_LEAK_DB) * rounded)


dry = scene()
out = record(dry)
bounce(out)
```